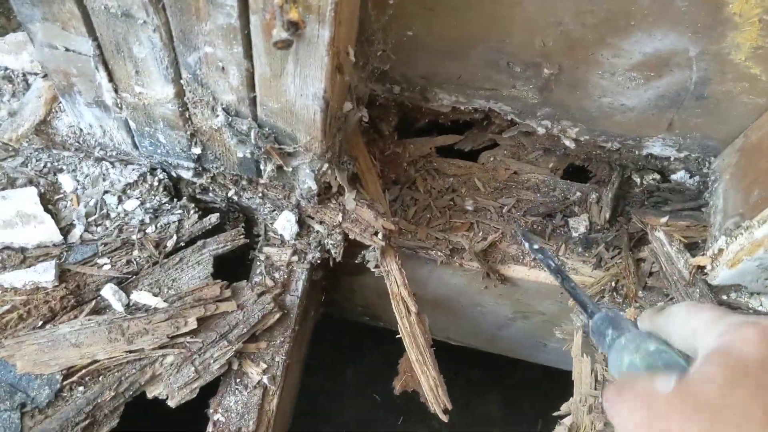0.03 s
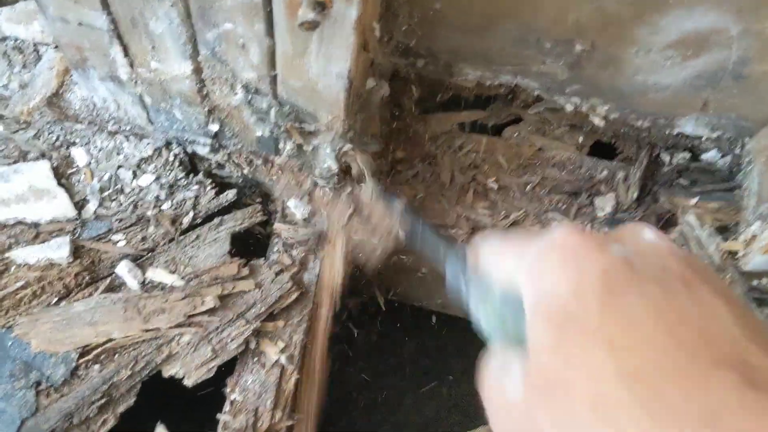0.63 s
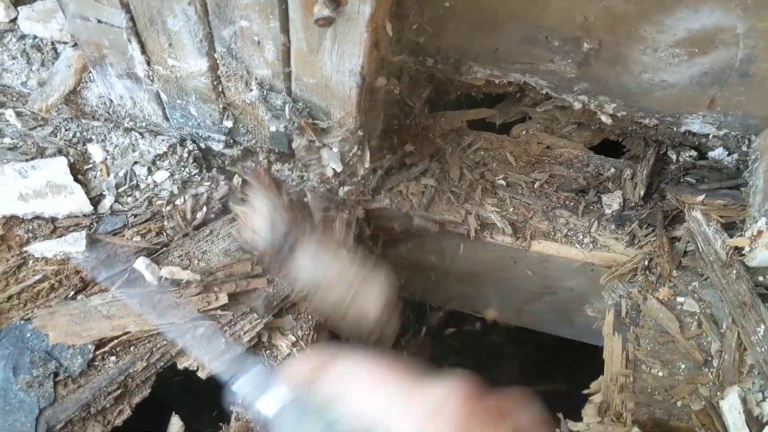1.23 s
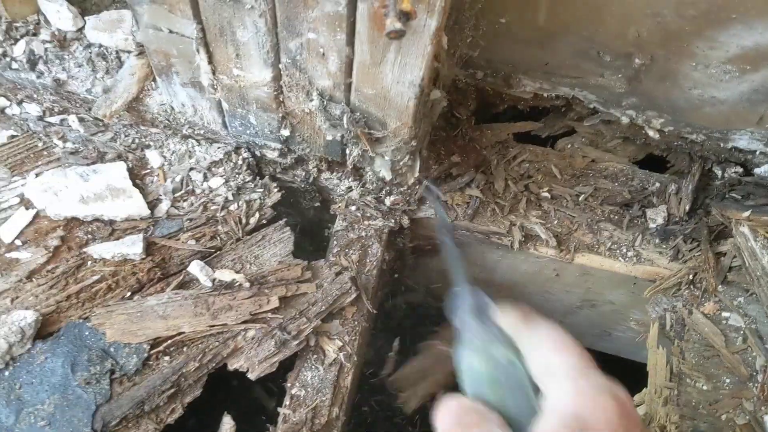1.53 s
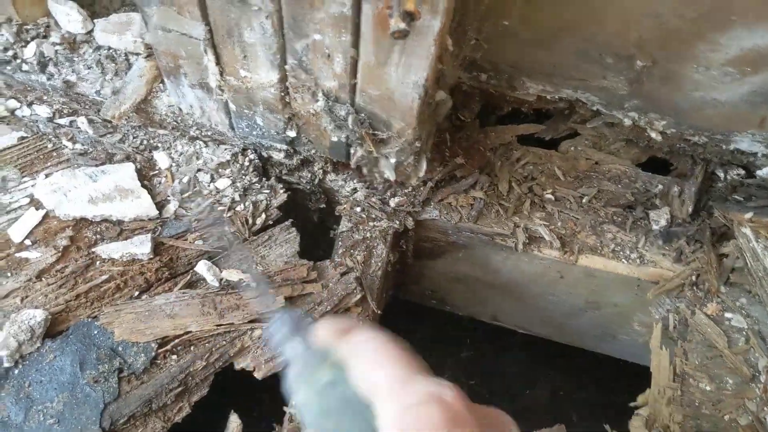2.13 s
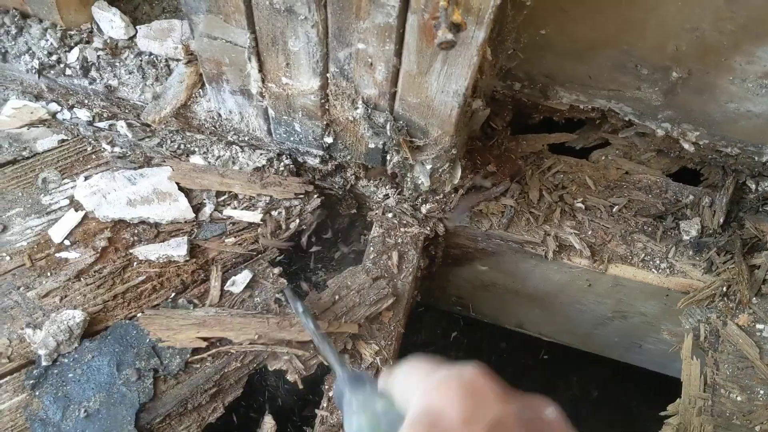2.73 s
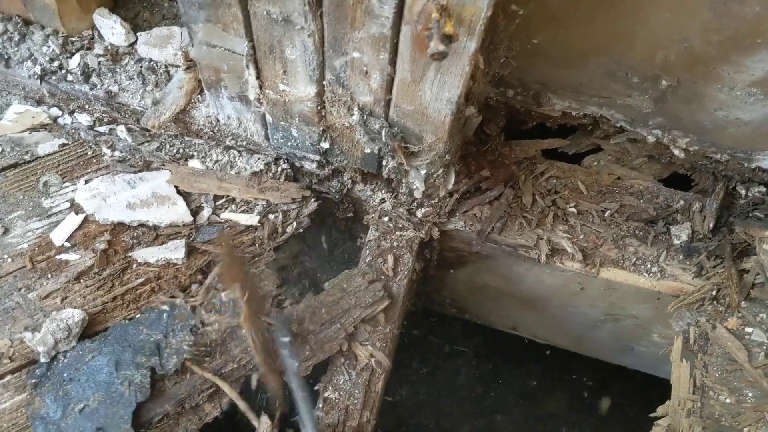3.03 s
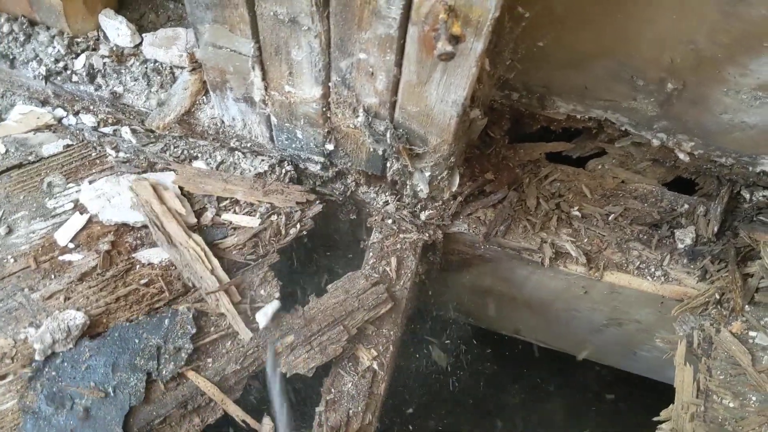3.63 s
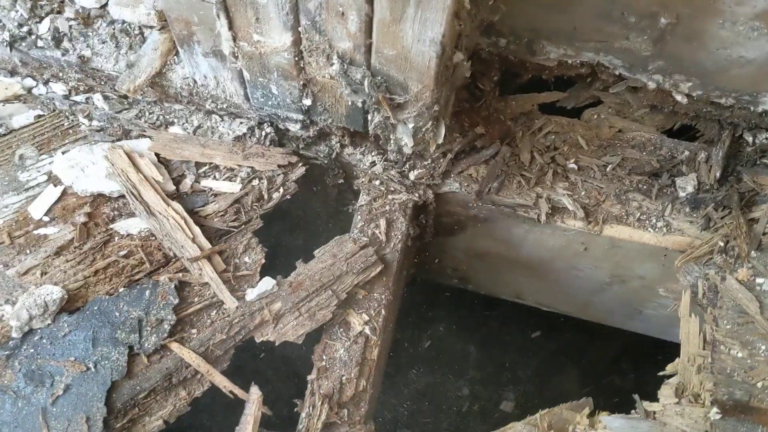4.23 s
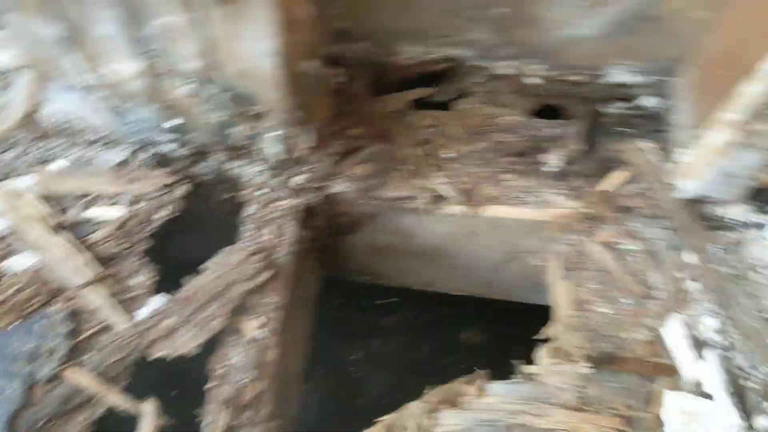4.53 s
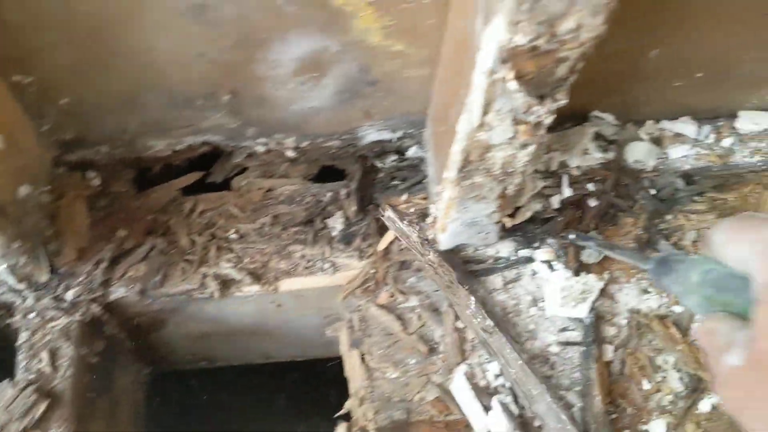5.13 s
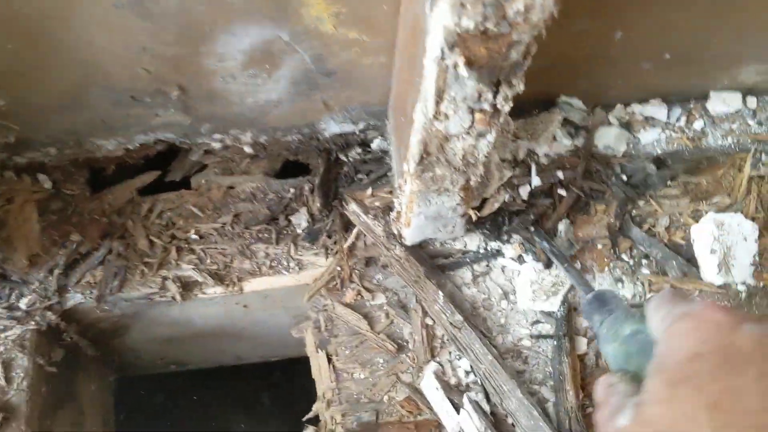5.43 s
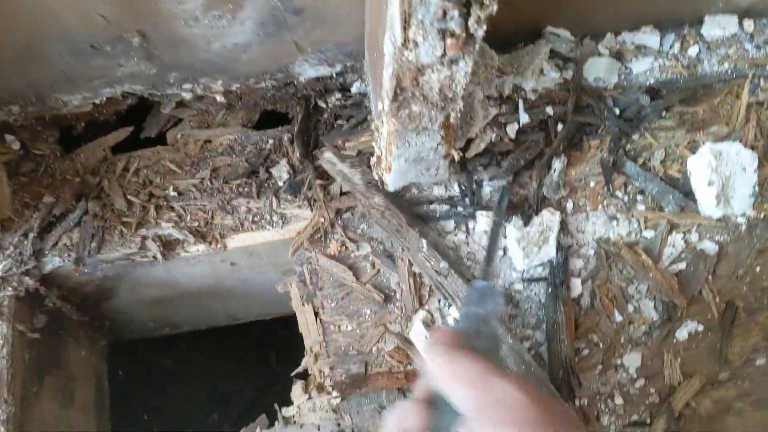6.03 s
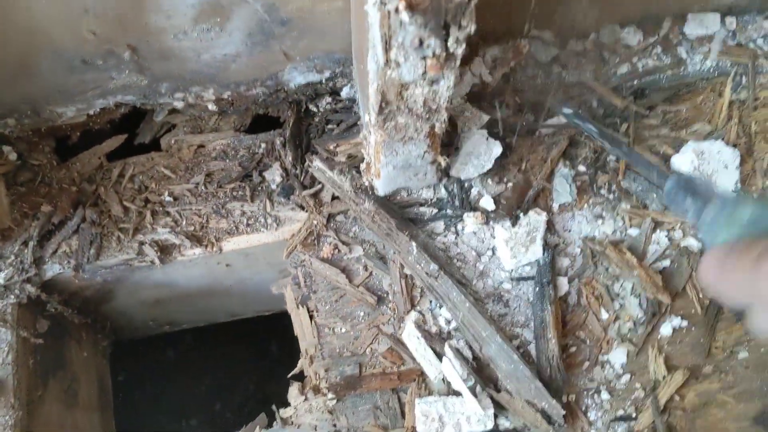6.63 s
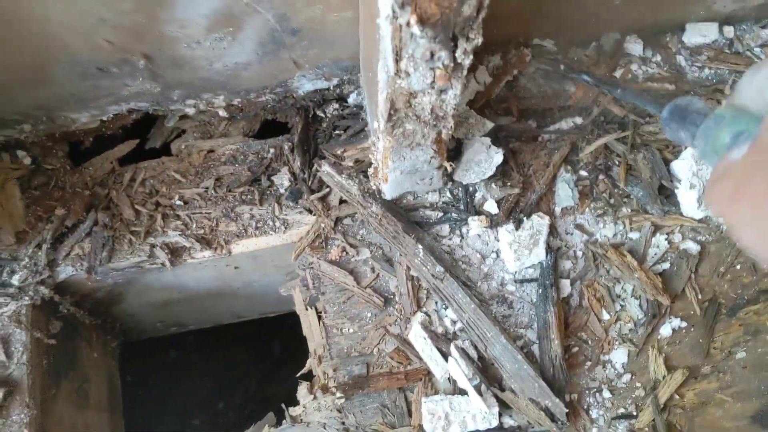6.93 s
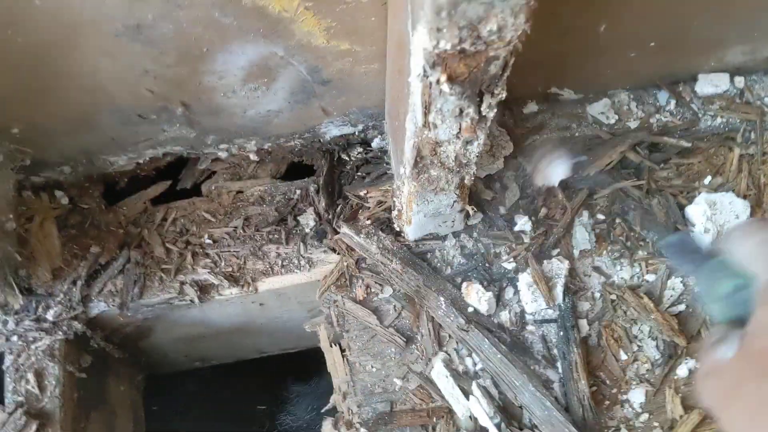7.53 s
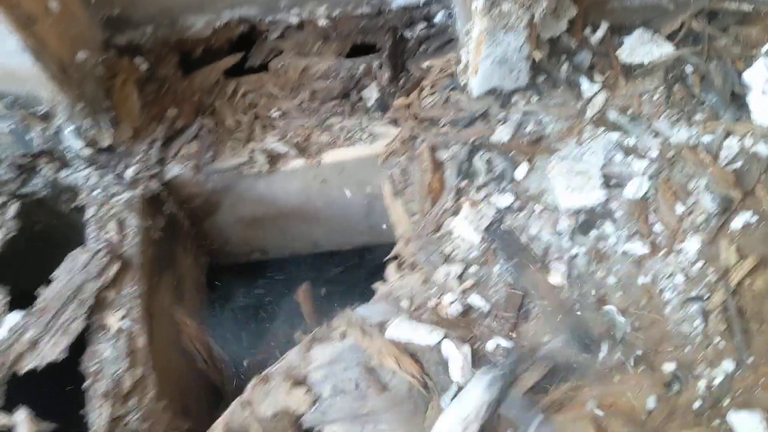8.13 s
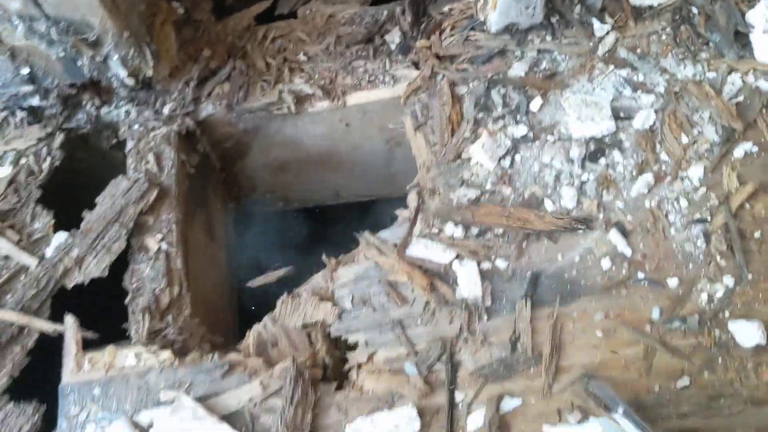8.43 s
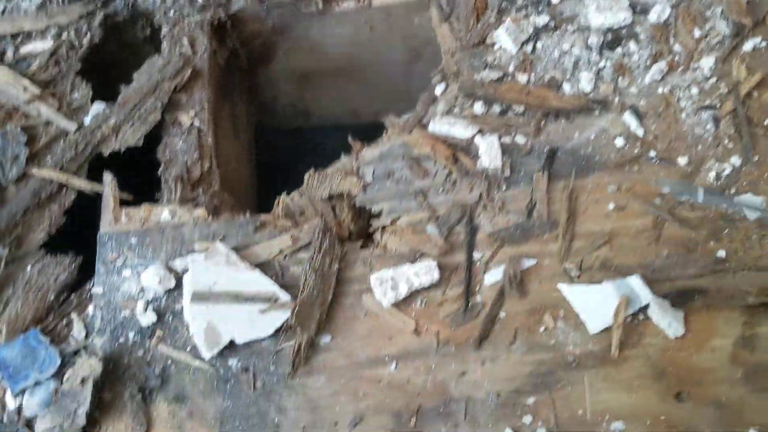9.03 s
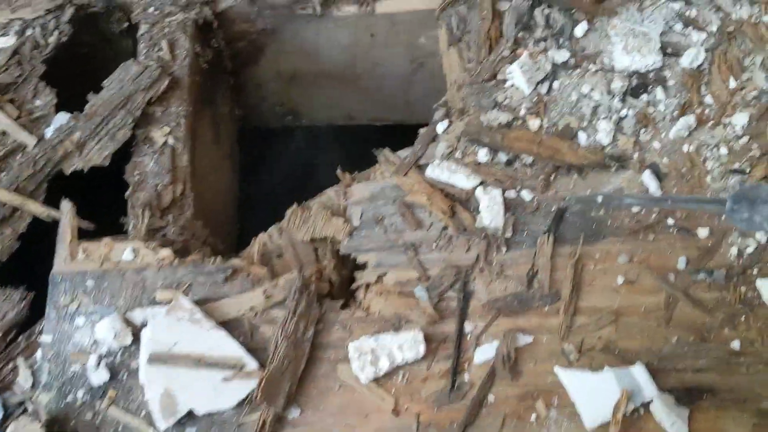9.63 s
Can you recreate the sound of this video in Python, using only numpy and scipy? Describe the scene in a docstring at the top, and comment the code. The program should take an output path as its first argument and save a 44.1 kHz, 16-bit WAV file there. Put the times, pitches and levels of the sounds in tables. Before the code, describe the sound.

A screwdriver stabs and pries rotten floorboards close by, with crunching cracks, hollow thuds and scattering debris in a small room.

```python
"""Screwdriver in rotten floorboards

A long screwdriver stabs and levers at the boards in a small bare room, close to the microphones.
Each blow crushes a burst of fibres and booms in the boards and joists; splinters tick down between blows.
The blade rakes through crumbs of wood and plaster while loose boards shift and rumble."""
import sys
import numpy as np
from scipy import signal
from scipy.fft import rfft, irfft, next_fast_len
from scipy.io import wavfile

SR = 44100
rng = np.random.default_rng(int(sys.argv[2]) if len(sys.argv) > 2 else 0)


def materialize(psi):
    """Save the field psi as 16-bit PCM at rate SR to the path in sys.argv[1].

    A 1-D psi becomes a single channel; in a 2-D psi each row is a channel.
    """
    bounded = np.clip(np.atleast_2d(psi).T, -1, 1)
    quanta = np.round(bounded * 32767).astype(np.int16)
    wavfile.write(sys.argv[1], SR, quanta)


N = 436590


def amp(db):
    return 10 ** (np.asarray(db) / 20)


def unit_rms(x):
    return x / np.sqrt(np.mean(x ** 2) + 1e-20)


def curve_at(points, hz):
    f, value = np.transpose(points)
    return np.interp(np.log(hz + 1), np.log(f + 1), value)


def add(mix, start_s, sound):
    part = mix[:, max(round(start_s * SR), 0):][:, :sound.shape[1]]
    part += sound[:, :part.shape[1]]


def filtered(x, response):
    size = next_fast_len(x.shape[-1] + SR // 4)
    return irfft(rfft(x, size) * response(np.fft.rfftfreq(size, 1 / SR)), size)[..., :x.shape[-1]]


def band(x, lo_hz, hi_hz):
    return signal.sosfilt(signal.butter(3, [lo_hz, hi_hz], "band", fs=SR, output="sos"), x)


def ringing(modes, hz):
    """Response of a body: the push itself plus its resonances."""
    return 1 + sum(amp(db) * 1j * hz * width / (f * f - hz * hz + 1j * hz * width)
                   for f, width, db in modes)


def swell(start_s, hold_s, rise_s, fall_db_per_s):
    """Attack, hold and release of one movement."""
    t = np.arange(N) / SR - start_s
    return np.clip(t / rise_s, 0, 1) * amp(-np.maximum(t - hold_s, 0) * fall_db_per_s)


def power_sum(swells, levels_db, rest_db):
    """Envelope of overlapping movements over a resting level; one row per column of levels."""
    power = amp(np.transpose(levels_db)) ** 2 @ np.square(swells)
    return np.sqrt(power + amp(rest_db)[:, None] ** 2)


def mic_pair(mid_side, apart_hz=800):
    """Two close microphones hear long waves alike and short waves differently."""
    mid, side = mid_side
    side = signal.sosfilt(signal.butter(1, apart_hz, "high", fs=SR, output="sos"), side)
    return np.array([mid + side, mid - side])


# Room decay: (frequency [Hz], T60 [s])
ROOM_T60 = [(60, 0.45), (160, 0.33), (420, 0.37), (1100, 0.36), (2900, 0.3), (7700, 0.33), (15000, 0.23)]


def room(direct, wet_db, build_s=0.0056, direct_side=0.85):
    """Direct sound, then dense echoes that die faster in the treble."""
    size = SR * 3 // 5
    t = np.arange(size) / SR
    echoes = rng.standard_normal((2, size)) * (rng.random((2, size)) < .3)
    echoes *= 1 - np.exp(-(t / build_s) ** 2)
    hz, frame_s, spectrum = signal.stft(echoes, SR, nperseg=256)
    decay = amp(-60 * frame_s / curve_at(ROOM_T60, hz)[:, None])
    tail = signal.istft(spectrum * decay, SR, nperseg=256)[1][:, :size]
    mid_side = amp(wet_db) * tail / np.linalg.norm(tail[0])
    mid_side[0, :len(direct)] += direct
    mid_side[1, rng.integers(2, 20):][:len(direct)] += direct_side * direct
    return mic_pair(mid_side)


# Still-air spectrum: (frequency [Hz], relative density [dB])
AIR_SPECTRUM = [(12, -38), (20, 15.5), (120, -40.5), (168, -20), (399, -4), (513, -12), (1370, -16),
                (1960, -20), (14300, -30.5), (16000, -49)]


def air(level_db=-55):
    """Faint steady background of the room."""
    noise = mic_pair(rng.standard_normal((2, N)))
    return amp(level_db) * unit_rms(filtered(noise, lambda hz: amp(curve_at(AIR_SPECTRUM, hz))))


# Modes of the floor and the hollow under it: (frequency [Hz], width [Hz], gain [dB])
FLOOR_MODES = [(36.2, 15, 2.5), (81.4, 27, 3.5), (120.8, 11.3, 8.5), (220, 75, 1), (279.8, 4.7, 2.5),
               (365.5, 4, 2), (581, 28, 7.5), (660, 33, 4.5), (830, 8.5, -24), (967, 3.2, -14),
               (1170, 160, -19), (1470, 15, -2), (1573, 52, -4.5), (1733, 9.2, -9.5)]
# Boards rocking on the joists: (start [s], hold [s], rumble [dB], boom [dB])
BOARD_ROCKS = [(.84, 0.25, -51, -47), (1.946, 0.11, -47.5, -55), (3.702, .35, -51, -54.5),
               (4.26, 0.03, -34, -41), (4.37, 0.026, -41, -61), (4.55, 0.13, -54, -63),
               (5.217, 0.057, -49, -56), (5.415, 0.037, -47.5, -68), (6.33, 0.023, -43, -49.5),
               (6.467, 0.081, -37.5, -41), (6.994, .3, -35, -37), (7.2, .05, -42, -33.5),
               (7.057, 0.04, -31, -52), (7.484, 0.072, -29, -27.5), (7.589, 0.41, -32, -39.5),
               (7.753, 0.029, -38, -34), (8.42, 0.034, -38, -34.5), (8.85, 0.27, -43.5, -54),
               (9.632, 0.086, -43, -34.5), (9.758, 0.056, -45, -40)]


def loose_boards(rest_rumble_db=-53, rest_boom_db=-57.5, jostle_db=3, jostle_per_s=28):
    """Loose boards rub and jostle unevenly, rumbling in the modes of the floor."""
    t = np.arange(N) / SR
    swells = [swell(s, hold_s, rise_s=0.012, fall_db_per_s=82.5) for s, hold_s, *_ in BOARD_ROCKS]
    rumble, boom = power_sum(swells, [row[2:] for row in BOARD_ROCKS], [rest_rumble_db, rest_boom_db])
    jolts = amp(jostle_db * np.clip(rng.standard_normal(size=1000), -2, 2))
    rub = rng.standard_normal((2, N)) * np.interp(t * jostle_per_s, np.arange(len(jolts)), jolts)
    floor = filtered(mic_pair(rub), lambda hz: ringing(FLOOR_MODES, hz) / (1 + hz / 25))
    return rumble * unit_rms(band(floor, 16, 128.6)) + boom * unit_rms(band(floor, 130, 336))


def grains(envelope, lo_hz, hi_hz, per_s, spread_db, q=1.6, wet_db=-2, sizes=10):
    """Each grain size clicks at its own pitch; harder raking moves more grains."""
    t = np.arange(SR // 50) / SR
    out = np.zeros((2, N))
    chance = per_s / SR / sizes * np.sqrt(envelope / envelope.mean())
    for hz in np.geomspace(lo_hz, hi_hz, sizes):
        at = np.flatnonzero(rng.random(N) < chance)
        strengths = amp(spread_db * np.minimum(rng.exponential(1, len(at)), 3.5))
        impulses = np.zeros(N)
        impulses[at] = strengths * rng.choice([-1, 1], len(at)) / np.sqrt(chance[at])
        click = np.sin(2 * np.pi * hz * t) * np.exp(-hz * t / q * np.pi) * hz ** 0.9
        click_in_room = signal.fftconvolve(click[None], room(np.ones(1), wet_db), axes=1)
        out += signal.oaconvolve(impulses[None], click_in_room, axes=1)[:, :N]
    return envelope * unit_rms(band(out, lo_hz / 1.3, min(hi_hz * 1.4, SR / 2.2)))


# Raked or spilling debris: (start [s], hold [s], level [dB], fineness [dB])
DEBRIS_SPILLS = [(0, .05, -53, 1), (0.097, .2, -66, 3.5), (0.469, .06, -54, 2), (.73, .08, -50, 0),
                 (0.799, .1, -39, 0), (.95, .12, -46, 0), (1.456, .2, -56, 0), (3.337, .14, -51, -2),
                 (3.694, .14, -48, 0), (3.87, .15, -58, 8), (4.079, .1, -61, 4), (5.155, .36, -56, -1),
                 (5.596, .68, -56.5, -1), (5.939, .08, -49, -1), (6.47, .1, -44, 0), (6.731, .07, -50, 3),
                 (6.86, .11, -54, 4), (7.307, .12, -50, -1.5), (7.444, .11, -34, -3.5),
                 (7.597, .13, -46, -0.5), (7.863, .18, -40, 0), (8.257, .08, -39, -1), (8.419, .06, -47, 0),
                 (8.142, 0.11, -53, 2), (8.493, .25, -55, 0), (8.989, .14, -62, -1), (9.534, .05, -64, 1.5)]


def debris(shed_re_crack_db=-17, shed_rise_s=.07, sift_db=-72, fineness_db=-1):
    """Lumps, crumbs and dust grind under the blade, trickle after each blow and never stop sifting."""
    spills = [(swell(s, hold_s, rise_s=.022, fall_db_per_s=95), db, fine_db)
              for s, hold_s, db, fine_db in DEBRIS_SPILLS]
    for s, *_, crack_db, _ in BLOWS:
        trickle = swell(s, shed_rise_s, shed_rise_s, fall_db_per_s=75.5)
        spills.append((trickle, crack_db + shed_re_crack_db, fineness_db))
    tilt = np.array([-1, 0, 1])  # fineness trades lumps for dust
    swells = [shape for shape, *_ in spills]
    levels_db = [db + fine_db * tilt for _, db, fine_db in spills]
    lumps, crumbs, dust = power_sum(swells, levels_db, sift_db + fineness_db * tilt)
    return (grains(lumps, 423, 1660, per_s=450, spread_db=7.5)
            + grains(crumbs * amp(-1), 2150, 5500, per_s=500, spread_db=4.8)
            + grains(dust, 5650, 12500, per_s=900, spread_db=1.5))


def fracture(crush_s, wet_db, fibres_per_s=12000, straggle_db=-19, straggle_s=0.021):
    """Fibres snap in a burst and a few stragglers follow; a slow crush fills the room slowly."""
    size = SR // 8
    t = np.arange(size) / SR
    u = t / max(crush_s, 1 / SR)
    burst = u * np.exp(1 - u) * rng.standard_normal(size) * (rng.random(size) < fibres_per_s / SR)
    stragglers = np.exp(-t / straggle_s) * rng.standard_normal(size) * (rng.random(size) < 500 / SR)
    force = burst / np.linalg.norm(burst) + amp(straggle_db) * stragglers
    return room(force, wet_db, build_s=0.0043 + 0.91 * crush_s)


# Registers of a hit, low and high thud, low and high knock, crack, fizz: (edge [Hz])
REGISTER_EDGES_HZ = [25, 130, 400, 950, 1750, 6000, 16000]


def voiced(hit, levels_db, over_s, first_register=0):
    """Sets each register of a hit to its RMS level, taken over over_s."""
    edges_hz = REGISTER_EDGES_HZ[first_register:]
    parts = (band(hit, lo, hi) for lo, hi in zip(edges_hz, edges_hz[1:]))
    return sum(amp(db) * part / np.sqrt(np.sum(part ** 2) / (2 * over_s * SR))
               for db, part in zip(levels_db, parts))


# Small snaps and landing chips: (time [s], crack level [dB], brightness [dB])
CHIP_TICKS = [(0.016, -55.5, 5), (0.523, -60, 6), (0.723, -49, -1), (0.74, -58, 13), (1.031, -48.5, -9),
              (1.062, -57, 3), (1.212, -63.5, -11.5), (1.287, -55.5, -1.5), (1.585, -68, 0.5),
              (1.602, -49.5, -3), (1.939, -63, -9), (2.064, -50, 1), (2.423, -79.5, 18),
              (2.943, -49.5, -12), (3.749, -50.5, -0.5), (3.795, -50.5, -3), (4.211, -54.5, -7),
              (4.359, -66.5, 15.5), (4.583, -67.5, -8), (5.226, -51.5, -2.5), (5.352, -64, -10),
              (5.367, -53, -5), (5.418, -55.5, -7.5), (5.486, -50.5, -2), (5.818, -55.5, 0),
              (5.917, -53, -4), (5.982, -58, 0), (6.127, -60, 9.5), (6.339, -56, -1), (6.474, -47, -7),
              (6.73, -48.5, -0.5), (6.758, -51, 1), (6.878, -70, 15), (7.311, -51.5, 0), (7.351, -48, -0.5),
              (7.54, -46, 3), (7.829, -43.5, -3), (7.867, -44, 4.5), (7.925, -38, -2.5), (8.171, -53, 0.5),
              (8.213, -48, -2.5), (8.445, -49.5, -6.5), (8.52, -52.5, -6.5), (8.8, -71.5, -17),
              (8.685, -54.5, 9), (9.023, -67, 3), (9.746, -62, 12)]


def chips(ring_db=1, ring_q=5):
    """Each chip has a few dull resonances; small bright ones trade knock for fizz."""
    out = np.zeros((2, N))
    for s, db, bright_db in CHIP_TICKS:
        modes = [(f, f / ring_q, ring_db) for f in 1200 * 10 ** rng.random(size=4)]
        snap = fracture(crush_s=0.002, wet_db=-3, fibres_per_s=4500, straggle_db=-9)
        tick = filtered(snap, lambda hz: ringing(modes, hz))
        levels_db = [db - bright_db - 5, db - bright_db, db, db + bright_db]
        add(out, s, voiced(tick, levels_db, over_s=0.07, first_register=2))
    return out


# Steel blade modes: (frequency [Hz], width [Hz], full gain [dB])
BLADE_MODES = [(3161, 25, 0), (9641, 30, 11), (14720, 60, 1)]


def blade(knock_db, full_db=-20, db_per_db=.8):
    """Only hard stabs set the steel shaft ringing."""
    return [(hz, width, db + db_per_db * min(knock_db - full_db, 0)) for hz, width, db in BLADE_MODES]


def split_level(level_db, note_hz, mid_hz, db_per_octave=8.5):
    """Shares power between two registers, favouring the side where the note lies."""
    lean_db = db_per_octave * np.log2(note_hz / mid_hz)
    lower_db = level_db - 10 * np.log10(1 + amp(lean_db) ** 2)
    return [lower_db, lower_db + lean_db]


# Blows and breaks: (time [s], crush time [s], echo offset [dB], board note [Hz], splinter note [Hz],
# thud [dB], knock [dB], crack [dB], fizz [dB])
BLOWS = [(0.089, 0.0034, -6, 140, 1070, -44.5, -50, -47.5, -47.5),
         (0.414, 0.0031, -2.5, 282, 660, -33, -44, -52.5, -46),
         (0.827, 0.0016, 2, 328, 1150, -42.5, -32.5, -37.5, -37),
         (0.858, 0.0064, -2.5, 304, 800, -39, -39, -33.5, -36),
         (1.326, 0.0013, 4, 360, 497, -28.5, -34.5, -42, -39.5),
         (1.359, 0.0027, -2.5, 206, 1160, -30, -28.5, -34, -42.5),
         (1.748, 0.0045, -5, 390, 728, -23.5, -19.5, -46, -48),
         (2.495, 0.0028, -1, 195, 956, -23.5, -19.5, -29, -32.5),
         (2.511, 0.0015, -7.5, 205, 624, -29, -28, -31, -31.5),
         (2.716, 0.0014, -5.5, 197, 630, -30.5, -31, -42, -56),
         (2.827, 0.0029, -1.5, 157, 1300, -23, -19, -28.5, -29.5),
         (3.026, 0.0016, -4.5, 215, 840, -32, -29, -40, -49),
         (3.154, 0.0038, -1.5, 165, 1300, -16.5, -16, -24, -28),
         (3.39, 0.002, -5, 218, 650, -39.5, -43.5, -57, -54),
         (3.494, 0.00076, -0.5, 255, 682, -15.5, -14.5, -25.5, -27),
         (4.2273, 0.0026, -8.5, 190, 2600, -28.5, -55, -32.5, -31.5),
         (4.233, 0.00079, -3, 64, 520, -24.5, -37, -50, -60),
         (5.517, 0.0023, -6, 170, 1630, -56, -39.5, -45, -52.5),
         (5.997, 0.0014, -5.5, 144, 1320, -49, -40.5, -46.5, -51.5),
         (6.202, 0.0014, -3, 91.3, 1050, -41.5, -41, -52, -55),
         (6.508, 0.0097, -6, 254, 1080, -41, -31.5, -38.5, -36.5),
         (6.962, 0.0011, -6.5, 189, 403, -32.5, -42, -68.5, -54),
         (7.102, 0.00095, -3.5, 60, 1440, -36.5, -68, -42, -41.5),
         (7.141, 0.0034, -7.5, 230, 910, -45, -39.5, -44, -54),
         (7.373, 0.0019, 3.5, 260, 570, -29, -37, -63, -54),
         (7.43, 0.014, 0.5, 201.5, 770, -30.5, -23.5, -36.5, -40),
         (7.503, 0.0021, -5.5, 120, 1150, -27.5, -38, -40, -40),
         (7.7, 0.0018, -8, 197, 1140, -32.5, -46, -41.5, -47.5),
         (7.856, 0.0056, 2, 202, 460, -31.5, -38, -71, -49),
         (7.972, 0.0056, 0, 88, 750, -30.5, -33.5, -42, -50),
         (8.253, 0.0014, 7, 119, 1535, -41, -21.5, -32, -30.5),
         (8.272, 0.0016, -2.5, 64.4, 760, -27.5, -32, -28.5, -33.5),
         (8.292, 0.00037, -2, 250, 650, -53, -47, -34, -36),
         (8.343, 0.0071, -9, 69.5, 1070, -34.5, -28, -38, -44),
         (8.611, 0.0047, -7, 161, 1670, -25, -27.5, -34, -37),
         (9.47, 0.00091, -3, 191, 397, -39, -55, -69, -61.5),
         (9.57, 0.0077, -7.5, 120, 1103, -30.5, -33, -40, -33)]


def blows(wet_db=3, board_db=2, board_q=7, splinter_db=9, splinter_q=12, shard_db=2, shard_q=22):
    """Each fracture rings the floor, the struck board, the splinter, a few shards and the blade."""
    out = np.zeros((2, N))
    for s, crush_s, echo_db, board_hz, splinter_hz, thud_db, knock_db, crack_db, fizz_db in BLOWS:
        thuds_db = split_level(thud_db, board_hz, mid_hz=130)
        knocks_db = split_level(knock_db, splinter_hz, mid_hz=970)
        board = (board_hz, board_hz / board_q, board_db)
        splinter = (splinter_hz, splinter_hz / splinter_q, splinter_db)
        shards_hz = np.exp(rng.uniform(np.log(700), np.log(3800), size=5))
        shards = [(f, f / shard_q, shard_db) for f in shards_hz]
        modes = FLOOR_MODES + [board, splinter] + shards + blade(knocks_db[1])
        hit = filtered(fracture(crush_s, wet_db + echo_db), lambda hz: ringing(modes, hz))
        add(out, s, voiced(hit, thuds_db + knocks_db + [crack_db, fizz_db], over_s=0.13))
    return out


def scene():
    return blows() + chips() + debris() + loose_boards() + air()


# Microphone colour: (frequency [Hz], gain [dB])
MIC_RESPONSE = [(30, 1.5), (380, -3), (490, -1.5), (600, -2.5), (1600, -4.5), (1980, -5.5), (2500, 2),
                (4300, -1.5), (5800, 0), (6900, -2.4), (7900, -0.5), (11500, 1.3), (13000, -0.9),
                (15500, 1.5)]
# Microphone imbalance: (frequency [Hz], left over right [dB])
MIC_BALANCE = [(100, 0), (500, -1), (1100, 2.5), (2000, 1.5), (3800, -1.5), (8000, 0), (14000, -1)]


def record(dry, cutoff_hz=16050):
    """Colour of each microphone, soft overload on the hardest blows, then the band limit."""
    def response(hz):
        return amp(curve_at(MIC_RESPONSE, hz) + np.outer([.5, -.5], curve_at(MIC_BALANCE, hz)))

    saturated = np.tanh(filtered(dry, response))
    lowpass = signal.firwin(511, cutoff_hz, window=("kaiser", 9), fs=SR)
    return signal.oaconvolve(saturated, lowpass[None], "same")


dry = scene()
out = record(dry)
materialize(out)
```